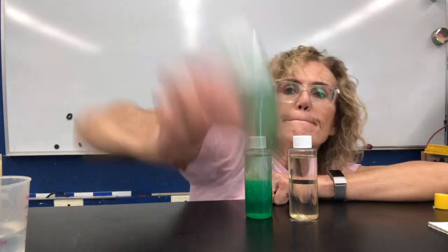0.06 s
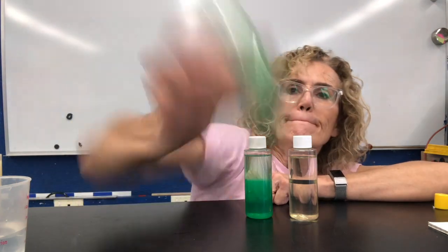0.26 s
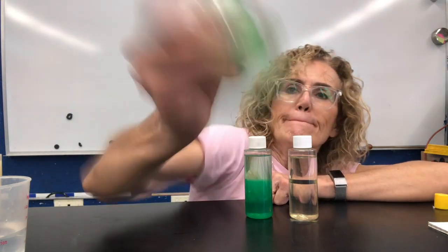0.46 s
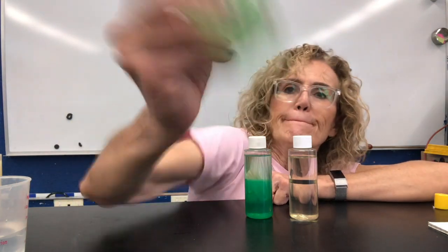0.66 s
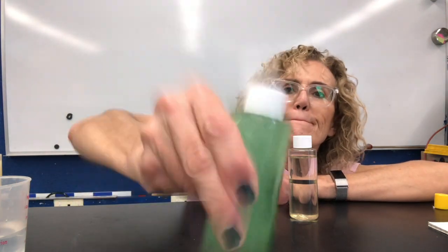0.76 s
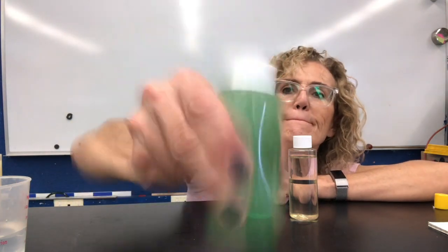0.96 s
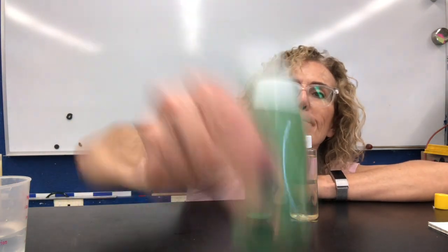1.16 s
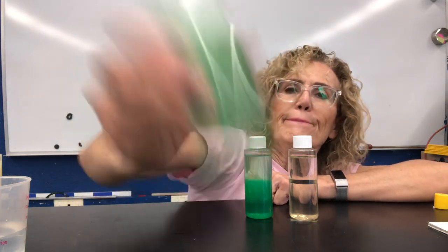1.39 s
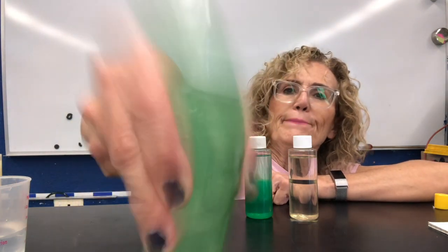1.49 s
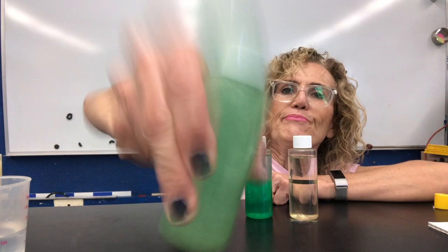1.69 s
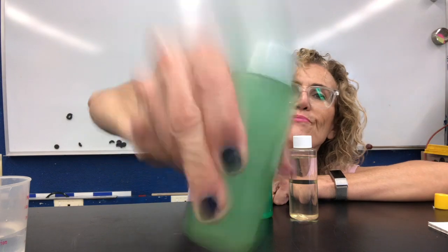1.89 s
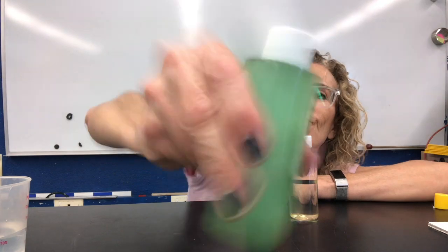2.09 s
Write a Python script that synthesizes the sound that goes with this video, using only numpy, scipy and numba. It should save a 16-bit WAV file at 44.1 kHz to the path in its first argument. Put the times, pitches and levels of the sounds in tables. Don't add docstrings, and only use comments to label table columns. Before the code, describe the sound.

Water sloshes rapidly back and forth in a small capped plastic bottle shaken close to the microphone, with bubbly gulps and sharp ticks; one boomy table knock lands past midway, then the splashing weakens over faint room rumble.

```python
import sys
import numpy as np
from scipy import signal
from scipy.fft import rfft, irfft
from scipy.io import wavfile
from scipy.ndimage import uniform_filter1d
from numba import njit

SR = 44100
rng = np.random.default_rng(int(sys.argv[2]) if len(sys.argv) > 2 else 0)


def inscribe(sig):
    pcm = np.round(np.clip(np.atleast_2d(sig).T, -1, 1) * 32767)
    wavfile.write(sys.argv[1], SR, pcm.astype(np.int16))


def elevation(decibels):
    levels = np.asarray(decibels, float)
    return 10 ** (levels / 20)


N = 94462
KNOCK_S = 1.2688

# (frequency [Hz], density [dB per Hz])
SPLASH_SPECTRUM = [(250, -6), (450, -8), (1000, -5), (2900, -12.5), (3800, -13), (5000, -15), (9000, -22),
                   (16000, -47.5)]


def curve(table, hz):
    points = np.array(table)
    return np.interp(np.log(np.maximum(hz, 1.)), np.log(points[:, 0]), points[:, 1])


def noise(table):
    hz = np.arange(N // 2 + 1) * SR / N
    x = irfft(rfft(rng.standard_normal(N)) * elevation(curve(table, hz)), N)
    return x / x.std()


def first_order_band(low_hz, high_hz):
    b, a = signal.butter(1, [low_hz, high_hz], "band", fs=SR)
    return signal.lfilter(b, a, rng.standard_normal(N))


@njit
def grains(n, start, hz, cycles, bend, rise, size):
    out = np.zeros(n)
    for k in range(len(start)):
        f = hz[k]
        level, phase, onset = 1., 0., 0.
        i = int(max(start[k], 0.))
        fade = np.exp(-6.9078 * f / cycles[k])
        while level > .002 and i < n:
            onset += (1 - onset) / rise[k]
            out[i] += size[k] * level * onset * onset * np.sin(6.2832 * phase)
            phase += f
            f = min(f * (1 + bend * f), .42)
            level *= fade
            i += 1
    return out


def rings(s, hz, cycles, bend, rise_s, size):
    return grains(N, s * SR, hz / SR, cycles + 0 * hz, 1. * bend, 1 + rise_s * SR + 0 * hz, size)


def air():
    # (frequency [Hz], density [dB per Hz])
    fan_spectrum = [(20, -17), (60, 1), (127, 1), (234, -2.5), (400, 0.5), (900, -27), (3000, -49),
                    (16000, -31)]
    # (frequency [Hz], level [dB rms])
    hum_lines = [(119.9, -58), (150.7, -65.5), (239, -59)]
    t = np.arange(N) / SR
    waver_db = 2.5 * 60 * uniform_filter1d(rng.standard_normal((len(hum_lines), N)), size=4000)
    hum = 0
    for (hz, db), waver in zip(hum_lines, waver_db):
        hum = hum + elevation(db + waver) * np.sin(2 * np.pi * hz * t)
    return elevation(-56) * noise(fan_spectrum) + hum


def knock():
    # (frequency [Hz], level [dB], decay time T60 [s])
    table_modes = [(50.4, -31.5, 0.49), (113.6, -30, 0.57), (121.7, -21.5, 0.57), (167, -4.5, 0.089),
                   (243, -2.5, 0.064), (193.4, -24, 0.5), (282.7, -22.5, 0.35), (336, -15, 0.14),
                   (385.5, -16, 0.22), (535.6, -6, 0.057), (616, 1, 0.025), (644, -11.5, 0.11),
                   (822, -23.5, 0.11), (1079, -16.5, 0.043)]
    # (frequency [Hz], density [dB per Hz])
    boom_spectrum = [(18, -51.5), (30, -30), (74, -21.5), (118, -1), (221, -10.5), (386, -7.5),
                     (431, -17.5), (624, -16.5), (2500, -53.5), (3250, -74), (5500, -120)]
    push_s, push_cycles = 0.00087, .2
    node_hz = 180
    boom_db, boom_t60_s, boom_rise_s = -17.5, 0.48, .016
    crack_db, crack_s, crack_hz = -22.5, 0.018, 1200

    hz, db, t60 = np.array(table_modes).T
    sign = np.where(hz < node_hz, 1, -1)
    modes = rings(KNOCK_S + 0 * hz, hz, hz * t60, 0, push_s + push_cycles / hz, sign * elevation(db + 2))

    t = np.maximum(np.arange(N) / SR - KNOCK_S, 0)
    crack = first_order_band(crack_hz / 2, crack_hz * 2)
    crack = elevation(crack_db) * (t > 0) * np.exp(-t / crack_s) * crack
    boom_envelope = elevation(boom_db - 60 * t / boom_t60_s) * (1 - np.exp(-t / boom_rise_s))
    return modes + crack + boom_envelope * noise(boom_spectrum)


def fizz():
    # (centre time [s], half length [s], level [dB])
    foam_bursts = [(0.046, .03, -76), (0.45, 0.035, -56), (0.623, 0.033, -57), (0.787, 0.063, -61),
                   (0.88, .015, -63), (0.972, 0.012, -54.5), (1.272, .012, -61), (1.314, 0.017, -57),
                   (1.346, 0.0071, -62.5), (1.425, 0.0063, -58.5), (1.465, 0.0086, -60.5),
                   (1.575, .008, -61.5), (1.655, 0.026, -59.5), (1.84, 0.011, -57.5), (2.036, .015, -59)]
    wash_db, wash_after_knock_db = -55.5, -66
    t = np.arange(N) / SR
    fine = signal.lfilter(*signal.butter(2, 9000, "high", fs=SR), rng.standard_normal(N))
    grit = elevation(6 * 4.8 * uniform_filter1d(rng.standard_normal(N), size=40))
    foam = sum(elevation(db) * np.exp(-((t - s) / half) ** 4) for s, half, db in foam_bursts)
    flicker_db = 2.0 * 17 * uniform_filter1d(rng.standard_normal(N), size=300)
    wash = elevation(np.where(t < KNOCK_S, wash_db, wash_after_knock_db) + flicker_db) * noise(SPLASH_SPECTRUM)
    return foam * fine * grit + wash


def ticks():
    # (time [s], peak level [dB], pitch [Hz], snap level relative to the peak [dB])
    impacts = [(0.0296, -24.5, 3400, -21), (0.0424, -25, 3550, -17), (0.0936, -19, 3770, -41),
               (0.1684, -24.5, 2120, -28), (0.2303, -24.5, 3800, -18), (0.298, -14, 7620, -40),
               (0.3418, -24.5, 2320, -36.5), (0.4068, -22, 3750, -21.5), (0.4935, -29, 5400, -15.5),
               (0.5495, -18.5, 3820, -25), (0.5717, -22.5, 3170, -35), (0.596, -45, 2080, -11),
               (0.6106, -17, 4210, -18.5), (0.6535, -32.5, 2160, -17.5), (0.7307, -20, 3820, -33.5),
               (0.9073, -30.5, 2040, -21), (0.9827, -23.5, 3840, -28.5), (1.0335, -26, 6950, -25),
               (1.1047, -26, 2480, -28), (1.1555, -28, 2500, -21), (1.315, -32, 4800, -12),
               (1.3487, -35, 2320, -13.5), (1.5409, -40.5, 2370, -20), (1.581, -35, 7700, -16.5),
               (1.668, -34.5, 1890, -23), (1.9634, -32, 1920, -41), (2.109, -35.5, 1860, -20),
               (.0752, -21, 3730, -35), (.1506, -34, 3850, -36), (.3287, -31, 2050, -28),
               (.3656, -26, 2180, -30), (.4404, -35, 1880, -21), (.5267, -28, 2090, -32),
               (.7208, -39, 2280, -35), (.7322, -23, 2410, -31), (.7761, -32, 1490, -16.5),
               (.8809, -37, 1900, -25), (.9652, -30, 2160, -23), (1.0959, -31.5, 1700, -30.5),
               (1.3896, -30.5, 2720, -30.5), (1.4534, -36, 1780, -33), (1.4963, -33.5, 2270, -36),
               (1.5642, -25, 3770, -33), (1.677, -25, 6730, -35), (1.7283, -42, 2320, -20),
               (1.7557, -27.5, 3700, -30.5), (1.7657, -32, 2350, -22.5), (1.8665, -41, 2166, -25),
               (1.9259, -39.5, 3330, -21), (1.9463, -34.5, 3590, -34)]
    ring_cycles, ring_db, ring_rise_s = 12.9, 3, 0.00038
    gap_s, pitch_spread = 0.0017, 0.23
    snap_db, snap_rise_s, snap_fall_s = 8, 0.00059, 0.0015

    s, db, hz, bright = np.array(impacts).T
    t = np.arange(N) / SR
    snap = 0
    for at, level in zip(s, db + bright):
        time_constant = np.where(t > at, snap_fall_s, snap_rise_s)
        snap = snap + elevation(level + snap_db) * np.exp(-np.abs(t - at) / time_constant)
    crisp = first_order_band(4000, 12000)

    chance = rng.random((len(s), 8)).T
    cluster = 0
    for k in range(4):
        when = s + k * gap_s * chance[k]
        pitch = np.minimum(hz * (1 + pitch_spread * k * (chance[k + 4] - .5)), 15000.)
        cluster = cluster + rings(when, pitch, ring_cycles, 0, ring_rise_s, elevation(db + ring_db - 4.4 * k))
    return cluster + snap * crisp


def pockets():
    # (time [s], peak level [dB], start pitch [Hz], pitch fall [fraction per cycle])
    trapped_air = [(.109, -32, 676, 0.089), (.229, -23.5, 1180, 0.43), (.333, -35, 537, 0.043),
                   (.348, -39, 594, 0.029), (0.374, -41.5, 490, 0.025), (.421, -21.5, 1420, 0.22),
                   (.441, -23, 1310, 0.057), (.512, -34, 910, 0.032), (.594, -25.5, 1300, 0.03),
                   (.611, -19, 1310, 0.43), (.703, -35.5, 527, 0.049), (.767, -34, 1200, 0.028),
                   (0.802, -20, 1350, 0.22), (.832, -38, 563, 0.069), (0.983, -21, 1290, 0.075),
                   (.995, -29.5, 960, 0.12), (1.224, -26.5, 1540, 0.02), (1.457, -37, 463, 0.041),
                   (1.555, -33, 946, 0.059), (1.575, -28.5, 1440, 0.051), (1.707, -41.5, 647, 0.1),
                   (1.766, -33.5, 990, 0.076), (1.817, -42, 520, 0.043), (1.962, -38.5, 930, 0.085),
                   (.232, -34, 612, 0.11), (.424, -31.5, 796, 0.22), (0.803, -32.5, 590, 0.15),
                   (.858, -39, 800, 0.15), (.615, -32.5, 706, .08), (0.423, -33.5, 1090, 0.032),
                   (.23, -31.5, 955, 0.06), (1.5, -41.5, 633, 0.029), (.066, -42, 394, 0.022),
                   (.098, -40.5, 524, .03), (.124, -40, 480, .02), (.342, -38.5, 478, .02),
                   (.632, -34, 960, .02), (.003, -37, 547, 0.032), (1.022, -37, 1190, 0.025),
                   (1.207, -41, 616, 0.044), (.782, -31, 1150, 0.018), (1.427, -38, 1260, 0.037),
                   (2.075, -41.5, 910, 0.067)]
    cycles, gain_db, rise_s = 12.73, 7.5, 0.00099
    s, db, hz, fall = np.array(trapped_air).T
    fall = np.clip(fall, 0, .5)
    out = 0
    for k in range(len(s)):
        one = slice(k, k + 1)
        out = out + rings(s[one], hz[one], cycles, -fall[k], rise_s, elevation(db[one] + gain_db))
    return out


def spray(count=260):
    # (centre time [s], half length [s], level [dB], brightness [dB per octave])
    surges = [(.0, 0.01, -43, -0.5), (0.049, 0.019, -40, 4.5), (0.1, 0.018, -44.5, 1.5),
              (0.17, 0.024, -41, 2), (0.237, 0.022, -40, 3.5), (.29, 0.015, -45, 2),
              (0.352, 0.019, -41.5, 4), (0.375, 0.012, -51, -1), (0.429, 0.029, -41.5, 3),
              (0.471, 0.033, -51, 3.5), (0.543, 0.017, -41, 3), (0.611, 0.021, -42, -0.5),
              (0.669, 0.031, -49.5, 2.5), (0.731, 0.012, -38.5, 2.5), (0.8, 0.035, -42.5, 2.5),
              (0.917, 0.014, -38.5, 2), (0.992, 0.033, -44.5, 0.5), (1.106, 0.015, -43.5, 5),
              (1.182, 0.026, -43, 0.5), (1.304, .022, -41, 3), (1.395, 0.021, -44, 1),
              (1.497, 0.016, -51, 0.5), (1.569, 0.016, -46.5, 4), (1.678, 0.014, -51.5, 6),
              (1.768, 0.011, -44, -1), (1.863, 0.018, -63.5, 2), (1.926, 0.0092, -57.5, 0),
              (1.962, .015, -50.5, 0.5), (2.06, 0.022, -54, 3.5), (2.119, 0.013, -51, 2),
              (0.882, 0.008, -72, 6), (1.461, 0.0096, -51, -2.5), (1.612, 0.0096, -62, -0.5),
              (1.727, 0.011, -50, -0.5), (1.792, 0.0064, -55.5, 2), (1.842, .008, -57.5, 1.5),
              (1.885, 0.0089, -60.5, 6.5), (1.937, 0.0085, -65, -1.5), (2.088, 0.014, -59, 0.5),
              (1.06, 0.0092, -57, 5)]
    drops_db, mist_db = 1.5, -10.5
    cycles, pitch_rise, rise_s = 10, .012, 0.00018
    tilt_db, scatter_db = 5.5, 2
    wall_hz, neck_hz, width_hz = 3750, 2250, 450
    gust_db, gust_s = 5, 0.0038

    t = np.arange(N) / SR
    hiss = noise(SPLASH_SPECTRUM)
    dull = signal.lfilter(*signal.butter(1, 2500, fs=SR), hiss)
    gusts = uniform_filter1d(rng.standard_normal(N), int(gust_s * SR))
    gusts = gust_db * np.clip(gusts / gusts.std(), -2, 2)

    drops, mist = 0, 0
    for s, half, db, bright in surges:
        chance = rng.random((count, 4)).T
        hz = 480 * 32 ** chance[0]
        hz[::6] = wall_hz + width_hz * (chance[0, ::6] - .5)
        hz[3::8] = neck_hz + width_hz * (chance[0, 3::8] - .5)
        when = s + half * (2 * chance[1] + rng.random(count) - 1.5) * 1.1

        level = db + curve(SPLASH_SPECTRUM, hz)
        level = level + tilt_db * np.log2(hz / 1000) + bright * np.log2(hz / 3000)
        level = level - scatter_db * np.log(0.12 + chance[2])
        level = level + np.interp(when, t, gusts) + 10 * np.log10(half / 0.04)
        drops = drops + rings(when, hz, cycles * (1 + 2 * chance[3]), pitch_rise, rise_s, elevation(level))

        swell = elevation(db) * np.exp(-.4 * np.abs((t - s) / half) ** 3)
        mist = mist + swell * (dull + (hiss - dull) * elevation(2 * bright))
    return elevation(drops_db) * drops + elevation(mist_db + gusts) * mist


def room(x):
    t60_s, top_hz, tail_db = 0.11, 5200, -18
    t = np.arange(SR // 2) / SR
    tail = rng.standard_normal(len(t)) * elevation(-60 * t / t60_s) * (t > .003)
    tail = signal.lfilter(*signal.butter(1, top_hz, fs=SR), tail)
    return x + elevation(tail_db) * signal.fftconvolve(x, tail / np.linalg.norm(tail))[:N]


def scene():
    bottle = spray() + pockets() + ticks() + fizz()
    return (room(bottle) + knock() + air())[None]


def low_pass(x):
    return signal.sosfilt(signal.butter(12, 15850, fs=SR, output="sos"), x)


def record(dry):
    x = signal.sosfilt(signal.ellip(8, .2, 70, 15900, fs=SR, output="sos"), dry)
    x = signal.sosfilt(signal.butter(3, 42, "high", fs=SR, output="sos"), x)
    mix = np.clip(x, -1, 1)
    return low_pass(mix)


dry = scene()
out = record(dry)
inscribe(out)
```